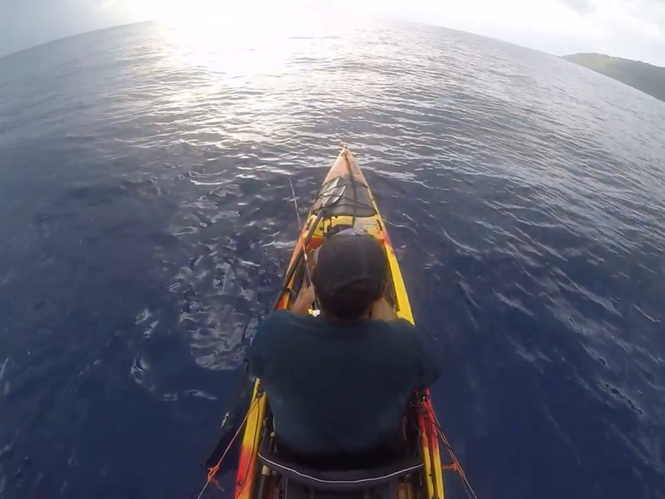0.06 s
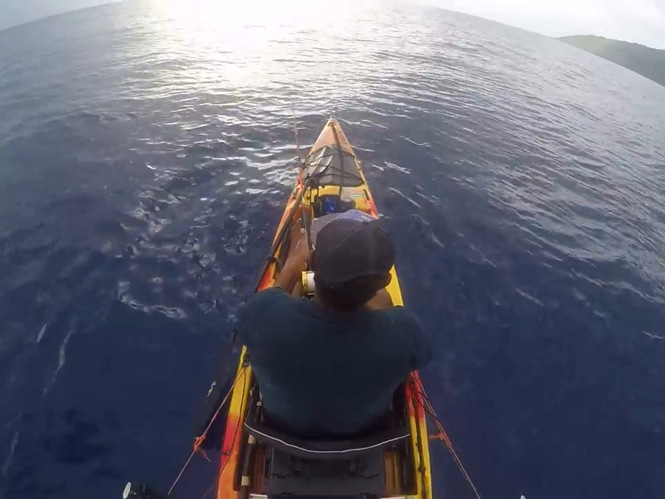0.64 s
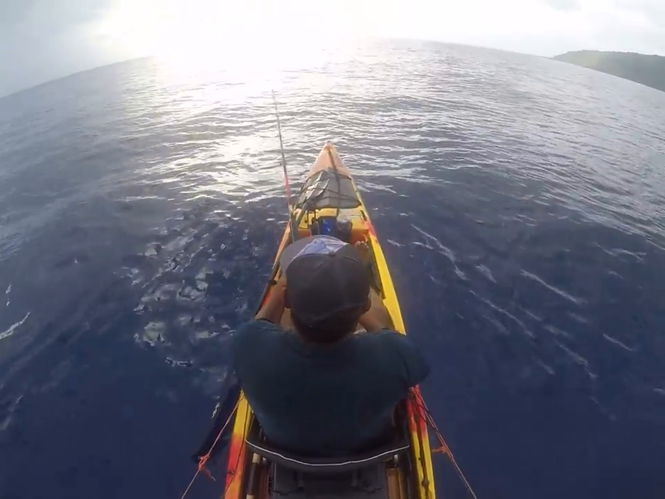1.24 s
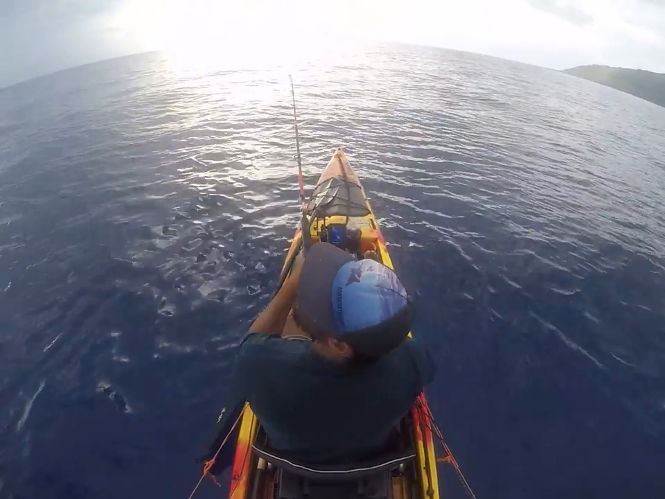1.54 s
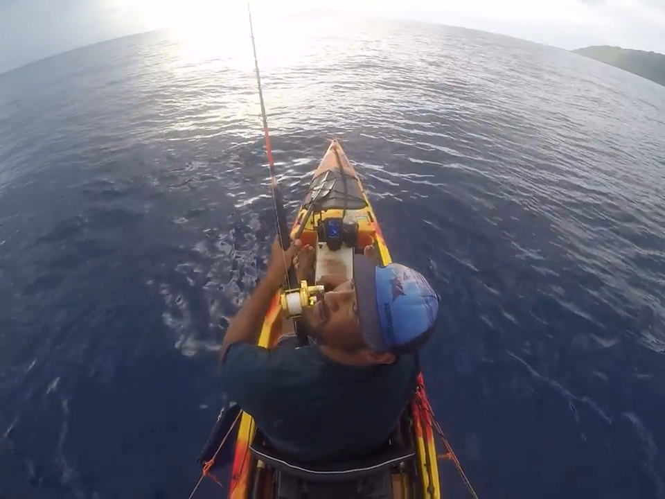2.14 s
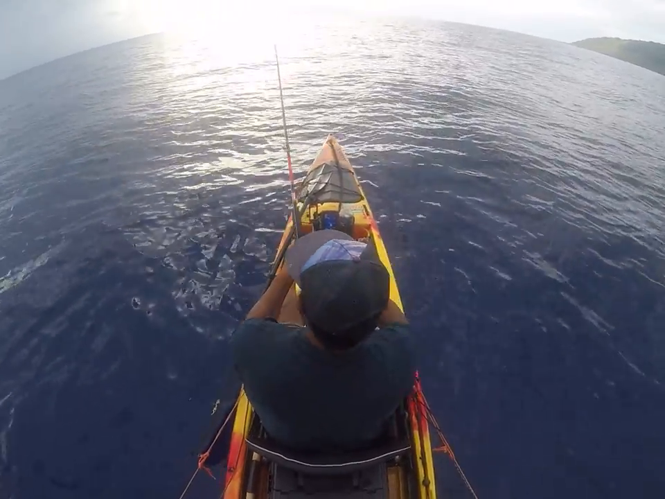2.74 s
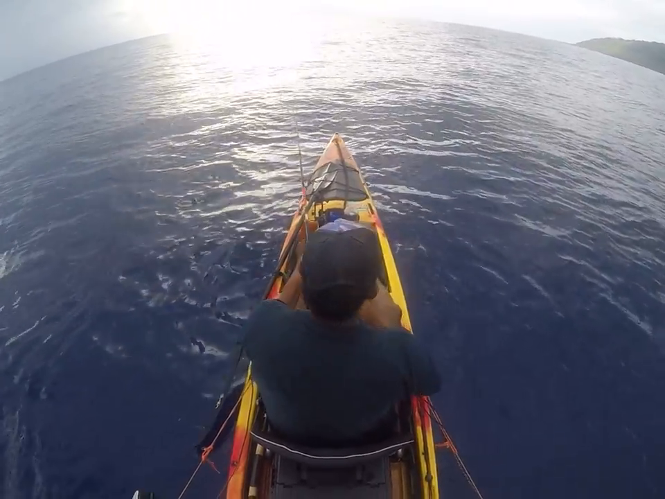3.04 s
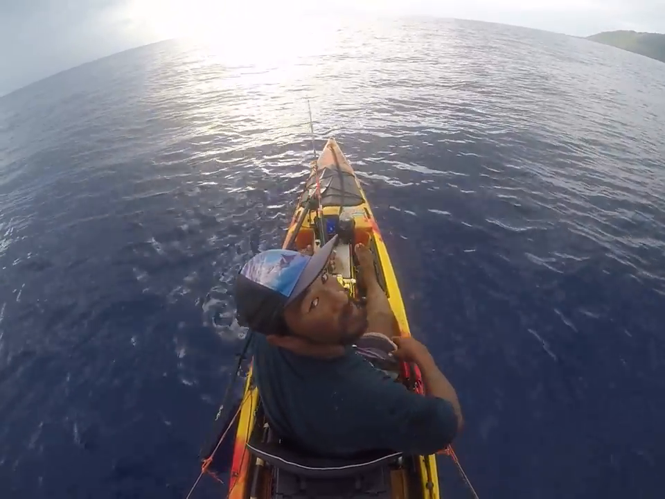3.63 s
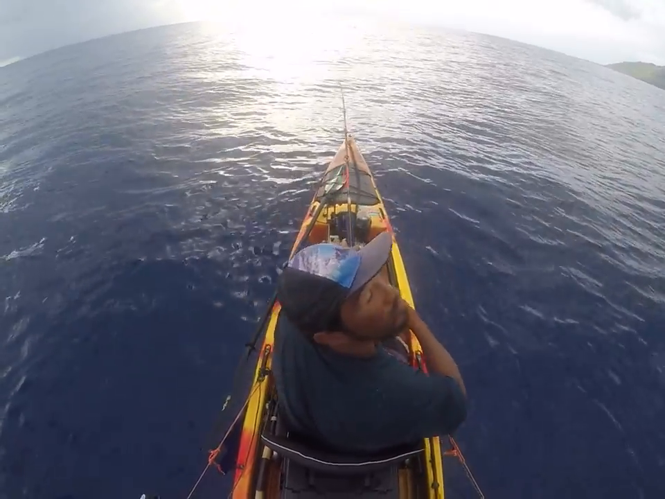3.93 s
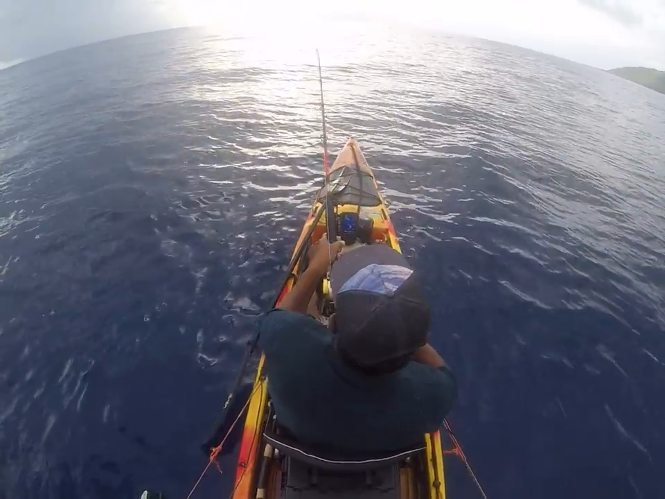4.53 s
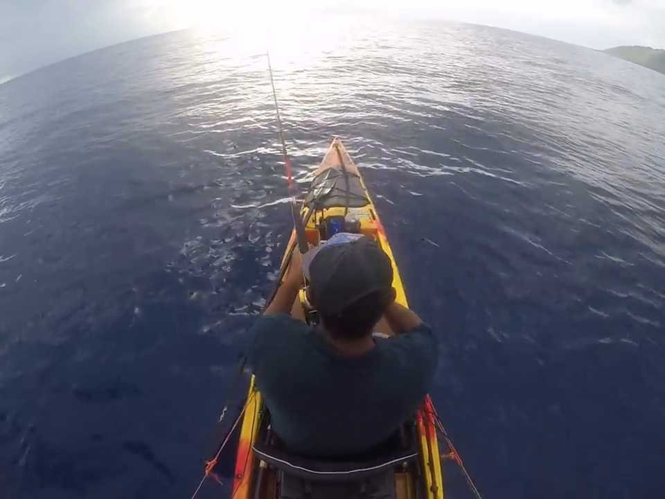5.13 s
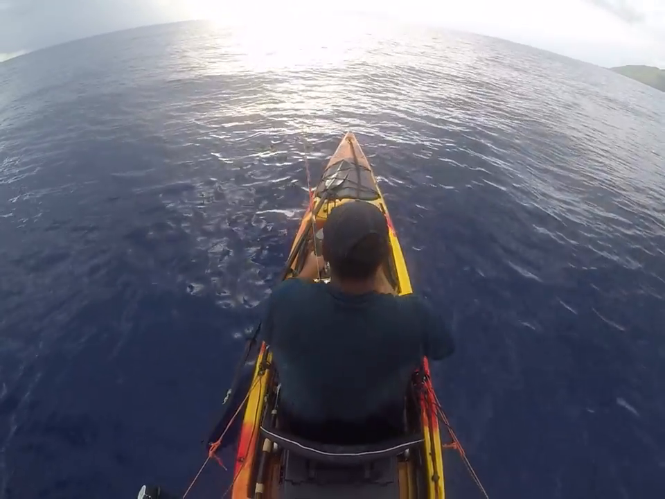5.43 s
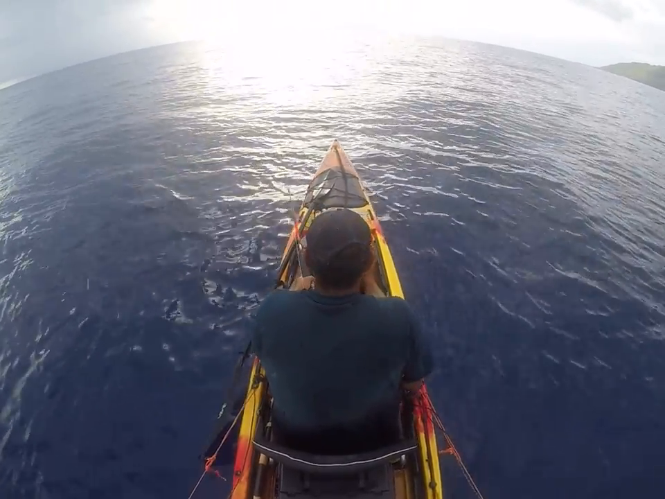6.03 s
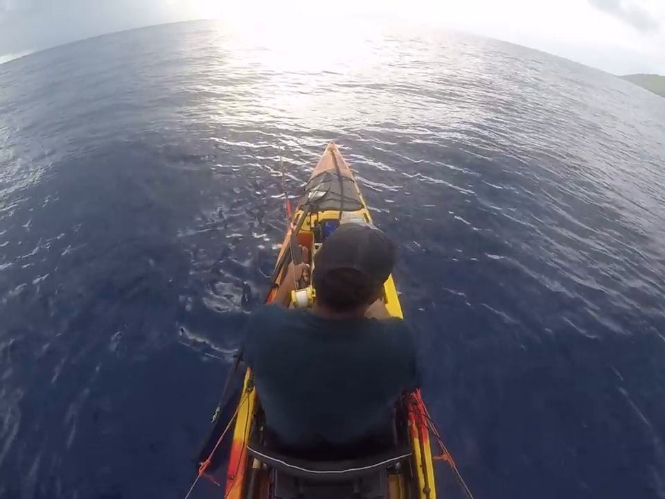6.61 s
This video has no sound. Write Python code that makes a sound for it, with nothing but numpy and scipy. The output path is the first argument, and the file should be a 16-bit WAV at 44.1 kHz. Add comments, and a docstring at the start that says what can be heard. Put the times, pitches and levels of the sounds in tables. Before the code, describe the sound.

Heard through an enclosed microphone on a kayak at sea, water washes softly under a low wind rumble and faint hiss. Wavelets hit the plastic hull, singly at first and then in loose clusters, making hollow slaps and deep thumps. Scattered glugs, brief hums from the hull and tiny droplet ticks fill the gaps. The sound is close and dull, easing briefly before a few more slaps near the end.

```python
"""Low wind rumble and a wash of water, with scattered glugs and low thumps: a kayak drifts at sea.
Small waves slap its hollow plastic hull; each rings the shell and the air inside, and the wave's
weight follows as a thump. Trapped air glugs, the hull hums briefly and droplets tick on the plastic.
The wash never stops, wind buffets the microphone's closed housing, and a thin hiss lies over it all."""
import sys
import numpy as np
from scipy import signal
from scipy.fft import rfft, irfft
from scipy.io import wavfile
from scipy.ndimage import uniform_filter1d

SR = 44100
rng = np.random.default_rng(int(sys.argv[2]) if len(sys.argv) > 2 else 0)


def put_to_file(sound):
    """Save the sound as 16-bit audio at rate SR, in the file named by the first command-line argument."""
    columns = np.atleast_2d(sound).T  # one column per channel
    safe = np.clip(columns, -1, 1)
    whole_steps = np.round(safe * 32767)
    wavfile.write(sys.argv[1], SR, whole_steps.astype(np.int16))


N = 298557
TIME = np.arange(N) / SR
AGE = np.arange(-int(.06 * SR), int(.28 * SR)) / SR  # seconds around one hit, with pre-roll

# Fader ride of the wind: t/s, relative level/dB
WIND_RIDE = [(0, -28.5), (.55, -30), (.85, -24.5), (1.45, -33.5), (1.9, -30.5), (2.05, -23), (2.35, -22),
             (2.55, -31), (2.64, -15.5), (2.78, -29.5), (3.0, -32), (3.5, -26.5), (4.15, -24.5),
             (4.7, -22.5), (5.1, -28.5), (5.9, -30), (6.1, -25), (6.77, -30)]
# Fader ride of the wavelets lapping between slaps: t/s, relative level/dB
LAPPING_RIDE = [(0, -45), (.25, -42), (.45, -43.5), (.75, -33.5), (1.35, -46), (1.7, -40), (1.92, -45.5),
                (2.55, -33), (3.05, -41.5), (3.4, -40.5), (4.05, -38.5), (4.8, -44), (5.1, -36.5),
                (5.5, -44.5), (5.75, -38), (5.92, -47.5), (6.25, -39), (6.77, -48)]

# Tone curves of the noise beds: f/Hz, relative level/dB
WIND_EQ = [(12, -11.5), (21, 2.5), (28, 5), (39, 5.5), (54, -24), (68, -31.5), (100, -43), (200, -50)]
SLOSH_EQ = [(40, -36), (56, 10), (68, -4), (82, 3), (105, -1), (128, -0.5), (150, -1.5), (168, -12.5),
            (300, -32)]
WASH_EQ = [(140, -19.5), (185, 2.5), (222, 2.5), (258, -1.5), (284, 0.5), (298, 3.5), (311, 0), (332, -9.5),
           (400, -15), (600, -27.5)]
RIPPLE_EQ = [(300, -1.5), (450, 3.5), (497, 6), (545, 2), (700, 4.5), (850, -6), (1080, -1), (1210, -12.5),
             (1380, -13), (1720, -11.5), (1950, -16), (2300, -18.5), (3200, -32), (6000, -32.5)]
HISS_EQ = [(500, 15), (2500, 5), (3200, -1), (4200, 0.5), (5500, -1.5), (7500, -2), (9000, 0), (10300, 0),
           (11500, -6.5), (13000, -7.5), (15000, -21)]

# Hull resonances in five families, from deep belly to bright edge: f/Hz, relative level/dB, t60/s
BELLY_MODES = [(126.7, -9, 0.25), (152.6, -14.5, 0.18)]
HOLLOW_MODES = [(205, 0.5, 0.076), (242, 2, 0.12), (286.5, -3.5, 0.13), (332.4, -15.5, 0.18)]
SMACK_MODES = [(507, -1.5, 0.054), (616, 1, 0.049), (712, 4.5, 0.011), (817, -4, 0.015), (835, 8, 0.016),
               (1084, -2.5, 0.045)]
SHELL_MODES = [(1382, -2.5, 0.023), (1490, -2, 0.014), (1708, -1.5, 0.03)]
EDGE_MODES = [(2120, 26.5, 0.012), (2160, 30.5, 0.012), (2480, -12, .012), (3000, -22, .012)]
# Shell resonances under a droplet's tap: f/Hz, relative level/dB, t60/s
TAP_MODES = [(1700, -0.5, 0.015), (2320, -10.5, 0.0084), (2400, -1, 0.0034)]

# Droplet cues: t/s, tick level/dB, f/Hz
DROPLET_CUES = [(1.14, -60.5, 3260), (1.3429, -63, 5550), (1.9807, -52.5, 3360), (2.0179, -52, 3400),
                (2.229, -51, 3330), (2.58, -52.5, 3250), (2.625, -59.5, 3250), (2.945, -55, 4120),
                (3.0614, -52.5, 4500), (3.4727, -52, 3270), (3.8164, -50, 3380), (4.183, -49, 3320),
                (4.19, -52, 3400), (4.4672, -47, 3550), (4.8764, -57, 3220), (5.2314, -53, 3740),
                (5.7411, -54.5, 4600), (5.98, -55, 3220), (6.004, -55.5, 3300), (6.0352, -60, 3100),
                (6.05, -58, 3150), (6.219, -56.5, 3480), (6.5301, -61, 5350), (6.6237, -59.5, 3060)]
# Glugs, low thumps and the hull's brief hum near 297 Hz: crest t/s, f/Hz, level/dB, decay/s
GLUG_THUMP_HUM_CUES = [(.135, 296, -29, 0.022), (0.216, 293, -29, 0.02), (0.502, 212, -23.5, 0.01),
                       (.717, 1370, -49, .013), (0.723, 259, -22, 0.017), (.794, 72.6, -3.5, 0.011),
                       (0.883, 278.3, -23.5, 0.027), (1.154, 222, -26, 0.0096), (1.160, 60, -17.5, 0.021),
                       (1.394, 363, -19.5, 0.0093), (1.402, 495, -24, 0.011), (1.719, 297.6, -28.5, 0.042),
                       (2.497, 62.6, -6, 0.0082), (2.534, 291, -27, 0.048), (3.128, 290, -34, 0.019),
                       (3.174, 89.6, -13.5, 0.033), (3.282, 298.7, -36, 0.12), (3.489, 242, -10, 0.017),
                       (3.574, 1056, -21, 0.006), (3.574, 1360, -19, 0.0071), (3.834, 244, -11, .015),
                       (4.43, 360, -17.5, 0.006), (4.502, 67, -7.5, 0.028), (4.955, 116.5, -11, 0.036),
                       (5.078, 227, -16, .011), (5.119, 205, -23, 0.035), (5.720, 286.2, -34.5, 0.099),
                       (6.009, 297, -14.5, 0.014), (6.151, 266, -30, .025), (6.259, 69.3, -11.5, .03),
                       (6.701, 132.4, -22.5, 0.066)]
# Wave slaps: t/s, smack level/dB, hollow level/dB, thump level/dB, thump f/Hz, edge boost/dB,
# closing/s (the time the water takes to close on the hull)
SLAP_CUES = [(0.356, -42.5, -33, -13, 65.4, -1, .004), (0.8468, -22, -12.5, -14.5, 53, -4, 0.0037),
             (1.3854, -24, -13.5, -23.5, 110, -14, 0.0061), (1.9925, -27, -19, -8.5, 54.7, 8, 0.0078),
             (2.0155, -23.5, -24, -22, 59.4, 7, 0.0077), (2.0699, -20, -16.5, -20, 54, -17, 0.0031),
             (2.2143, -19.5, -13, -7.5, 80, -9, .0055), (2.253, -33.5, -39, -12.5, 53.7, 4, 0.012),
             (2.2884, -37, -42, -20.5, 60, 0, 0.009), (2.594, -30.5, -11.5, -14, 81.6, 9, 0.0099),
             (2.6447, -35, -18, -18.5, 44.7, 14, 0.0051), (3.4227, -44.5, -40, -32, 59.7, -11, .003),
             (3.4824, -23, -12.5, -9.5, 78, 10, 0.0064), (3.5724, -22, -20, -19.5, 86, -9, 0.0093),
             (3.8204, -20, -14, -9.5, 74, -5, 0.0042), (4.1904, -15.5, -12, -15, 107.7, 10, .0048),
             (4.245, -23.5, -30, -12.5, 104, -10, .0045), (4.256, -19.5, -20, -32, 80, -3, 0.0072),
             (4.4224, -17.5, -19.5, -22, 89, -8, 0.0039), (4.4737, -22.5, -21, -16.5, 68, 4, .011),
             (4.9241, -27.5, -17, -11, 77.4, 3, .0028), (5.2484, -37.5, -20, -12, 82.7, -8, 0.0019),
             (6.002, -20, -17, -14.5, 78, 11, .004), (6.034, -41, -22, -13.5, 106.5, 9, .0022),
             (6.0505, -26, -16.5, -15.5, 59.6, 5, .003), (6.1301, -43, -35, -20, 119, 4, 0.0062),
             (6.6596, -38.5, -23.5, -15.5, 67, -1, 0.0035), (6.6862, -39.5, -38, -20, 67, -1, 0.0022)]


def undb(db):
    """Decibels to gain."""
    return 10 ** (np.asarray(db) / 20)


def unit(x):
    """Scale to rms 1."""
    return x / np.sqrt(np.mean(x ** 2))


def crest(x, db):
    """Set the level of a burst's loudest 4 ms."""
    return x * undb(db) / np.sqrt(uniform_filter1d(x ** 2, size=176).max())


def band(x, lo_hz, hi_hz, order=4):
    """Steep band-pass without delay."""
    return signal.sosfiltfilt(signal.butter(order, [lo_hz, hi_hz], "band", fs=SR, output="sos"), x)


def equalise(x, curve):
    """Apply a tone curve that rolls off past its ends; the result has rms 1."""
    hz, db = np.transpose(curve)
    f = np.maximum(np.arange(len(x) // 2 + 1) * SR / len(x), 1)
    skirts = np.minimum(1, f / hz[0]) ** 2 * np.minimum(1, hz[-1] / f) ** 2
    gain = undb(np.interp(np.log(f), np.log(hz), db))
    return unit(irfft(rfft(x) * skirts * gain, len(x)))


def place(out, at, burst):
    """Mix in a burst with its age zero on the cue time."""
    index = int(at * SR) + int(round(AGE[0] * SR)) + np.arange(len(burst))
    inside = (index >= 0) & (index < N)
    out[index[inside]] += burst[inside]


def swell(rise, decay):
    """Envelope: exponential rise to age zero, then exponential decay."""
    return np.exp(-np.abs(AGE) / np.where(AGE < 0, rise, decay))


def ride(curve, wander_per_s, wander_db):
    """Gain that follows a fader ride, with a smooth random wander on top."""
    hold = int(SR / wander_per_s)
    steps = rng.standard_normal(256)[np.arange(N) // hold % 256]
    wander = unit(uniform_filter1d(steps, size=hold))
    return undb(np.interp(TIME, *np.transpose(curve)) + wander_db * wander)


def wind():
    """Gusts buffet the closed housing: a sub-bass rumble."""
    gusts = ride(WIND_RIDE, wander_per_s=9, wander_db=1.5)
    return equalise(rng.standard_normal(N), WIND_EQ) * gusts * undb(-1)


def patter(per_s, spread_db):
    """A dense rain of small impulses of unequal size."""
    impulses = (rng.random(N) < per_s / SR) * rng.standard_normal(N)
    return impulses * undb(spread_db * np.minimum(rng.exponential(size=N), 4))


def bubbles(count=260, low_hz=420, high_hz=2000, cycles=9, glide=.16, spread_db=4, small_db=-9):
    """Small bubbles burst along the waterline; each rings briefly as its pitch climbs."""
    out, t = np.zeros(N), np.maximum(AGE[AGE < .06], 0)
    for when, smallness, strength in rng.random((count, 3)):
        hz = low_hz * (high_hz / low_hz) ** smallness
        life = t * hz / cycles
        db = spread_db * min(-np.log(1 - strength), 2.5) + small_db * smallness
        phase = 2 * np.pi * hz * t * (1 + glide * np.tanh(life / 6))
        place(out, when * N / SR, undb(db) * np.exp(-life) * np.sin(phase))
    return band(out, low_hz, high_hz)


def water_motion():
    """Envelope of the water at the hull: lapping wavelets, plus churn 8 dB under each smack."""
    churn_power = np.zeros(N)
    for at, smack_db, *_ in SLAP_CUES:
        place(churn_power, at, (undb(smack_db - 8) * swell(rise=.019, decay=.041)) ** 2)
    lapping = ride(LAPPING_RIDE, wander_per_s=11, wander_db=3)
    return np.sqrt(lapping ** 2 + churn_power)


def water_bed(calm_db=-41, ripple_share=.48):
    """Moving water keeps the hull murmuring: deep slosh, low-mid wash and fine bubbly ripples."""
    slosh = equalise(patter(per_s=500, spread_db=.7), SLOSH_EQ) * undb(10)
    wash = equalise(patter(per_s=400, spread_db=1.7), WASH_EQ) * undb(.5)
    ripples = equalise(patter(per_s=1800, spread_db=.52), RIPPLE_EQ)
    ripples += unit(bubbles()) * undb(-10.5)
    motion = water_motion()
    # ripples follow only a share of the motion's swing in dB around calm
    ripple_gain = undb(-52.5) * (motion / undb(calm_db)) ** ripple_share
    return motion * (slosh + wash) + ripple_gain * ripples


def contact(rise, decay, spatter=4):
    """Force of water on plastic: one blow inside a short spatter of smaller ones."""
    spray = swell(rise, decay) * rng.standard_normal(len(AGE))
    return (AGE == 0) + spatter * spray / np.linalg.norm(spray)


def ring(force, modes, reach, detune=.022, scatter_db=2):
    """Ring hull modes; waterline and point of contact vary their pitch, level and sign on each hit."""
    t, response = AGE[AGE >= 0], 0
    for hz, db, t60 in modes:
        pitch, share, side = rng.standard_normal(3)
        envelope = undb(db + scatter_db * share - 60 * t / t60)
        response += np.sign(side) * envelope * np.sin(2 * np.pi * hz * (1 + detune * pitch) * t)
    ringing = signal.fftconvolve(force, response)[:len(AGE)]
    # water pushes softly: the top rolls off at `reach` times the highest mode
    return band(ringing, modes[0][0] / 2, modes[-1][0] * reach)


def droplets(stray_count=9):
    """Tiny ticks, dulled by the housing; each taps the shell, the smaller, higher drops more lightly."""
    out = np.zeros(N)
    strays = [(when * N / SR, -65.5 + 4 * size, 3400 * 2 ** (.8 * pitch))
              for when, size, pitch in rng.random((stray_count, 3))]
    for at, db, hz in list(DROPLET_CUES) + strays:
        tick = band(contact(rise=.0012, decay=.003), hz * .72, hz * 1.3, order=3)
        tap = ring(contact(rise=.00043, decay=.0038, spatter=3.4), TAP_MODES, reach=1.55)
        tap_db = db + 12 - 33.5 * np.log2(hz / 3300)
        place(out, at + .0004, crest(tick, db))
        place(out, at, crest(tap, tap_db))
    return out


def throb(hz, rise, decay, glide=.027, rough=.13):
    """One short, rough tone of squeezed air or of the hull, bending slightly up in pitch."""
    envelope = np.where(AGE < 0, np.exp(-(AGE / rise) ** 2 / 2), np.exp(-np.abs(AGE) / decay))
    phase = 2 * np.pi * hz * AGE * (1 + glide * np.tanh(AGE / decay / 2)) + rng.uniform(0, 2 * np.pi)
    wobble = unit(band(rng.standard_normal(len(AGE)), 17, 120))
    return envelope * (1 + rough * wobble) * np.sin(phase)


def glugs_thumps_and_hum():
    """Glugs, low thumps and the hull's brief hum near 297 Hz; longer tails get softer attacks."""
    out = np.zeros(N)
    for at, hz, db, decay in GLUG_THUMP_HUM_CUES:
        place(out, at, undb(db) * throb(hz, rise=.4 * decay, decay=decay))
    return out


def splash(closing, edge_boost_db, usual_closing_s=.006):
    """A slap's bright top: water rakes the shell, harder if it closes slowly, and spray patters on it."""
    shell = ring(contact(rise=closing * 1.1, decay=.005), SHELL_MODES, reach=1.12)
    edge = ring(contact(rise=closing * 1.8, decay=.006), EDGE_MODES, reach=1.3)
    spray_force = swell(rise=.09, decay=.15) * rng.standard_normal(len(AGE))
    spray = ring(spray_force, SHELL_MODES, reach=1.4)
    shell_db = -14 + 6 * np.log2(closing / usual_closing_s)
    return crest(shell, shell_db) + crest(edge, edge_boost_db - 31) + crest(spray, -35)


def wave_slaps():
    """The stiff shell smacks first; belly and hollow add body, then the wave's weight thumps."""
    out, blow = np.zeros(N), 1. * (AGE == 0)
    for at, smack_db, hollow_db, thump_db, thump_hz, edge_boost_db, closing in SLAP_CUES:
        impact = contact(rise=closing * .6, decay=.004, spatter=.8)
        smack = ring(impact, SMACK_MODES, reach=1.08, detune=.02)
        attack = crest(smack, smack_db) + undb(smack_db) * splash(closing, edge_boost_db)
        hollow = ring(blow, HOLLOW_MODES, reach=1.37, detune=.0296)
        belly = ring(blow, BELLY_MODES, reach=4, detune=.0285)
        thump = throb(thump_hz, rise=.005, decay=.032)
        place(out, at + .00051, attack)
        place(out, at + .0023, crest(belly, thump_db - 7))
        place(out, at + .0027, crest(hollow, hollow_db))
        place(out, at + .01097, undb(thump_db) * thump)
    return out


def scene():
    """Mono mix: slaps, glugs, thumps, hull hum and droplets over a bed of wind and water."""
    return (wave_slaps() + glugs_thumps_and_hum() + droplets() + wind() + water_bed())[None]


def record(dry, hiss_db=-57.5, top_hz=15200):
    """Microphone hiss joins the mix, and a steep low-pass trims the top."""
    hiss = equalise(rng.standard_normal(N), HISS_EQ) * undb(hiss_db)
    low_pass = signal.ellip(8, .2, 70, top_hz, fs=SR, output="sos")
    return signal.sosfilt(low_pass, dry + hiss)


dry = scene()
out = record(dry)
put_to_file(out)
```